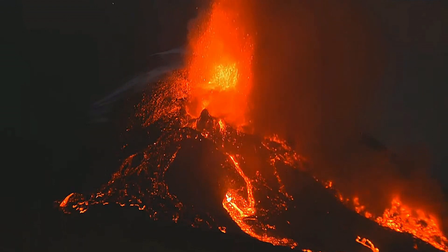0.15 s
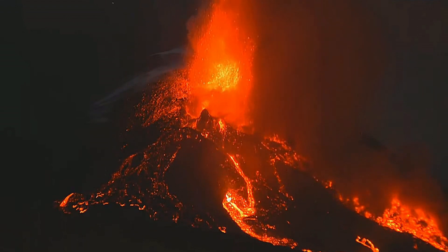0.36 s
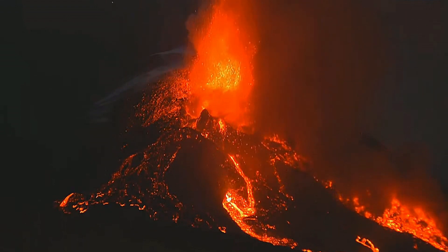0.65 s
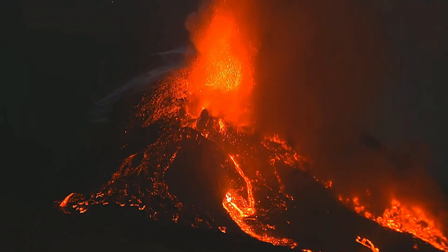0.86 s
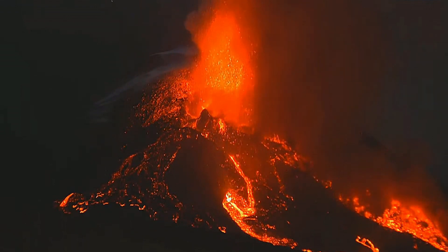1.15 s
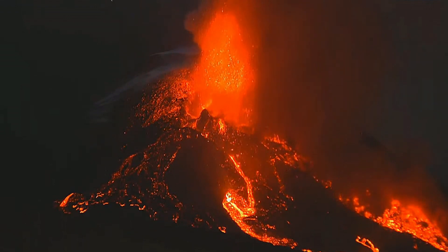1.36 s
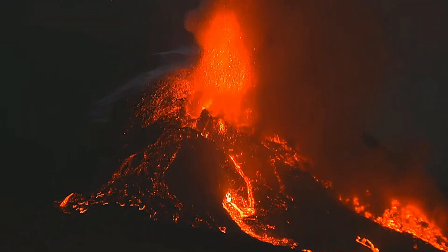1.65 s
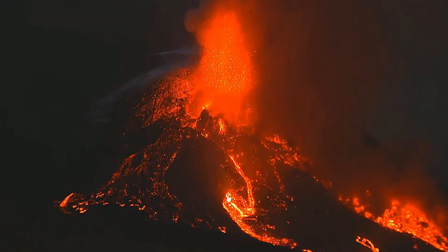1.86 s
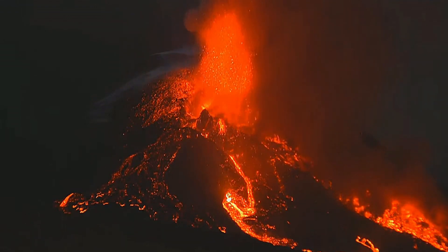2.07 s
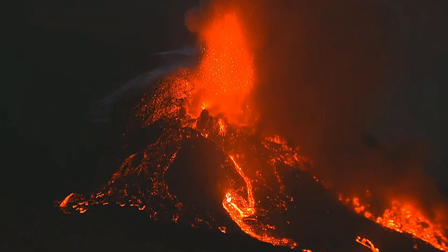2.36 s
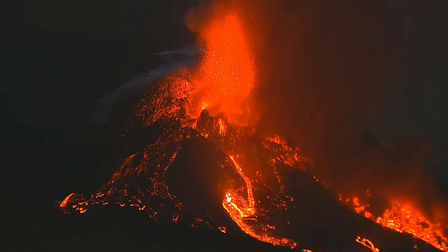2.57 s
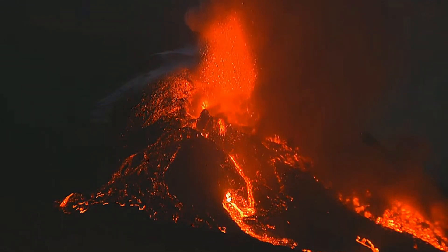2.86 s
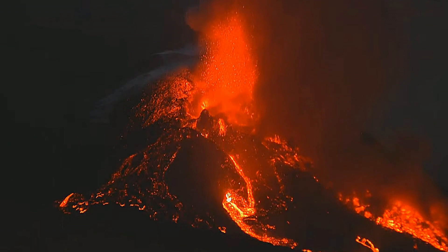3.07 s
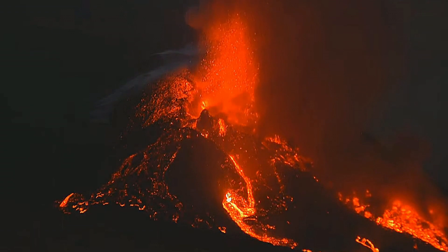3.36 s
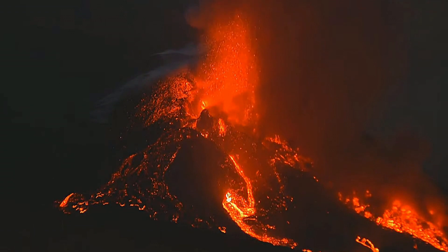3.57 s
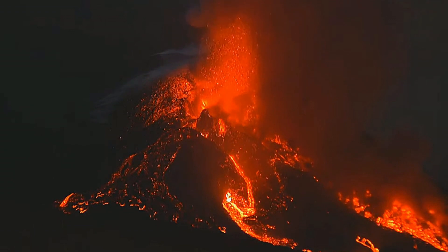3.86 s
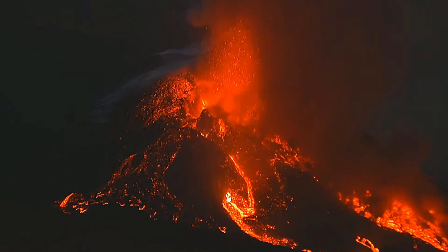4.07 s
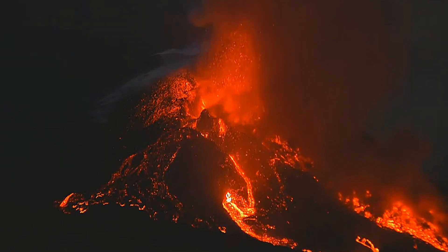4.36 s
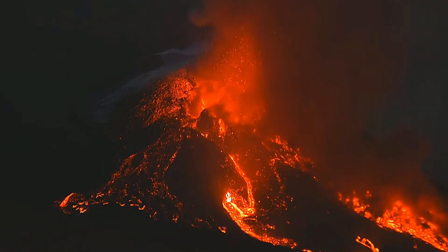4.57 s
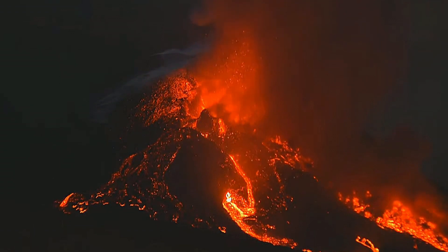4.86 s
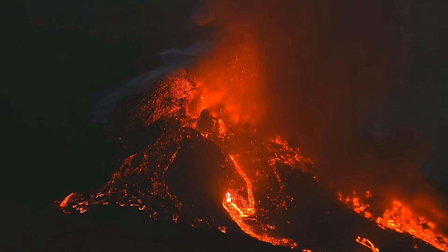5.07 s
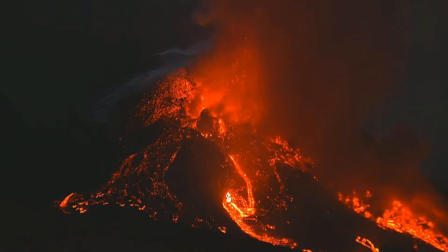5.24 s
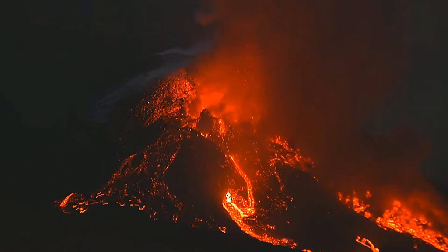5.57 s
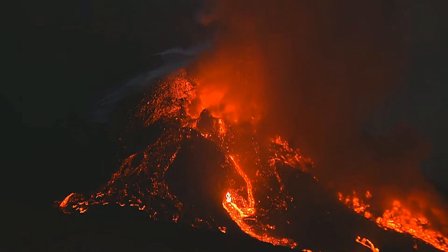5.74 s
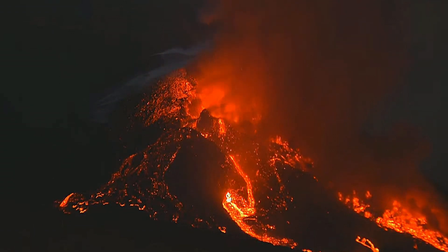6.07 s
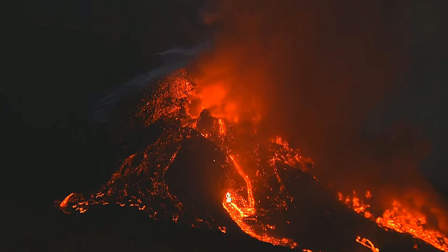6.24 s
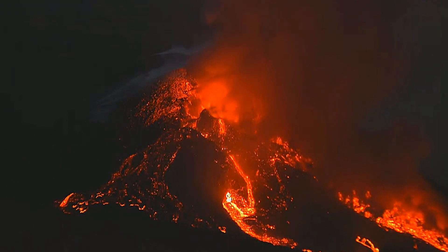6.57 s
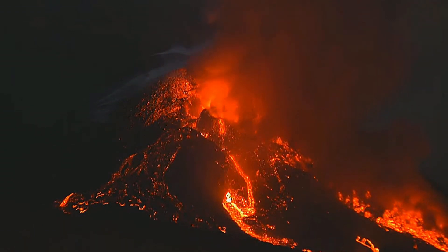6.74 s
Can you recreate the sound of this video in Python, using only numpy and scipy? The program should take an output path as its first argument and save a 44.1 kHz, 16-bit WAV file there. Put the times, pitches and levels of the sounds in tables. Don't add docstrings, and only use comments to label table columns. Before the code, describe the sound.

Outdoor stereo pickup of a distant volcanic eruption in the dark. The deep turbulent roar never stops; it sags a little after one second, pulses unevenly, and grows somewhat fuller near five seconds and again at the end. Its treble is dulled by distance and coloured by slope echoes. Barely audible nearby details include dry grit ticks, tiny high peeps, drifting night-air hiss and a thin, even microphone hiss.

```python
import sys
import numpy as np
from scipy import signal
from scipy.fft import rfft, irfft, next_fast_len
from scipy.io import wavfile
from scipy.ndimage import uniform_filter1d

SR = 44100
rng = np.random.default_rng(int(sys.argv[2]) if len(sys.argv) > 2 else 0)


def digitize_waveform(pressure):
    field = np.atleast_2d(pressure).T
    bounded = np.clip(field, -1, 1)
    quanta = np.round(bounded * 32767).astype(np.int16)
    wavfile.write(sys.argv[1], SR, quanta)


def attenuation_scalar(level_db):
    decades = np.asarray(level_db, float) / 20
    return 10 ** decades


N = 304731
TIME_S = np.arange(N) / SR
FRAME = next_fast_len(N)
HZ = np.fft.rfftfreq(FRAME, 1 / SR)

LAYER_SPLITS_HZ = [87, 135, 250]


def set_rms(x, db):
    return x * attenuation_scalar(db) / np.sqrt(np.mean(x ** 2))


def colour(table, hz):
    points = np.array(table, float)
    gain_db = np.interp(np.log(hz + 1), np.log(points[:, 0]), points[:, 1], left=-140, right=-140)
    return attenuation_scalar(gain_db)


def hiss(table):
    spectrum = rfft(rng.standard_normal(FRAME)) * colour(table, HZ)
    return set_rms(irfft(spectrum, FRAME)[:N], 0)


def swell(centre_s, rise_db, length_s):
    return rise_db * np.exp(-np.log(16) * ((TIME_S - centre_s) / length_s) ** 2)


def microphone_hiss():
    # (frequency [Hz], density [dB per Hz])
    mic_colour = [(3240, -35), (5500, -13.5), (6490, -15.5), (8640, -3), (9840, -10.5), (12900, 0.5),
                  (14700, 0.5), (15500, -5.5)]
    return attenuation_scalar(-75.5) * hiss(mic_colour)


def night():
    # (frequency [Hz], density [dB per Hz])
    night_colour = [(1470, -28.5), (2500, -9), (2640, 0), (3530, -1), (4250, -7), (5930, -16),
                    (6500, -28.5), (8450, -52.5), (14300, -120)]
    # (time [s], rise [dB], pitch [Hz], length [s])
    breezes = [
        (.22, 3.5, 2800, 0.4),
        (3.203, 6.5, 2100, .8),
        (4.902, 1, 3500, 0.38),
        (5.6, -1.5, 3500, .4),
    ]
    side_db, patchy_db = -14, 0.6
    reach_octaves = 1.1
    air = rfft([hiss(night_colour), attenuation_scalar(side_db) * hiss(night_colour)], FRAME)
    out = 0
    for band_hz in range(1000, 9000, 1000):
        patch = np.interp(np.arange(N), np.linspace(0, N, 110), rng.standard_normal(110))
        breath_db = 0
        for s, rise_db, pitch_hz, length_s in breezes:
            nearness = np.exp(-(np.log2(band_hz / pitch_hz) / reach_octaves) ** 2)
            breath_db = breath_db + swell(s, rise_db, length_s) * nearness
        share = np.clip(1 - np.abs(HZ - band_hz) / 1000, 0, 1)
        band = irfft(air * share, FRAME)[:, :N]
        out = out + band * attenuation_scalar(patchy_db * patch + breath_db)
    return out * attenuation_scalar(-76)


def ticks():
    # (time [s], peak [dB], centre [Hz], width [Hz], decay [s])
    grit = [(.1255, -50, 2700, 2000, .002), (.126, -67, 4700, 1600, .002), (.17, -64.5, 3900, 500, .04),
            (.172, -58, 2600, 1800, .04), (.2, -65, 3350, 300, .012), (.33, -63, 3200, 1100, .02),
            (.36, -69, 3300, 500, .012), (.615, -63, 2450, 400, .008), (2.708, -65, 3500, 400, .005),
            (2.8705, -48, 2600, 2000, .001), (2.871, -63, 4700, 1800, .001), (2.883, -63, 3000, 2000, .002),
            (4.598, -67, 3500, 1500, .003)]
    out, t = np.zeros(N), np.arange(4096) / SR
    for s, peak_db, centre_hz, width_hz, decay_s in grit:
        burst = rng.standard_normal(len(t)) * np.exp(-t / decay_s)
        burst[0] += 0.27 / decay_s ** 0.5
        band_hz = [centre_hz - width_hz / 2, centre_hz + width_hz / 2]
        burst = signal.sosfilt(signal.butter(3, band_hz, "band", fs=SR, output="sos"), burst)
        out[int(s * SR):][:len(t)] += attenuation_scalar(peak_db) * burst / np.abs(burst).max()
    return out


def peeps():
    # (time [s], length [s], start [Hz], end [Hz], peak [dB])
    calls = [(.415, .032, 2960, 2970, -71), (.455, .04, 3480, 3450, -73), (.52, .025, 2980, 2980, -74),
             (1.587, .06, 3400, 3410, -68), (1.655, .015, 3400, 3400, -73),
             (1.684, .028, 3400, 3400, -69.5), (1.72, .02, 3400, 3400, -68.5),
             (1.743, .019, 3400, 3400, -68.5), (1.76, .02, 3400, 3400, -72), (1.695, .055, 2955, 2995, -70),
             (1.735, .03, 3070, 3085, -73)]
    out = np.zeros(N)
    breath = uniform_filter1d(rng.standard_normal(N), size=150)
    hoarse = 1 + 0.15 * set_rms(breath, 0)
    for s, length_s, start_hz, end_hz, peak_db in calls:
        n = int(length_s * SR)
        phase = 2 * np.pi * np.cumsum(np.linspace(start_hz, end_hz, n)) / SR
        out[int(s * SR):][:n] += attenuation_scalar(peak_db) * np.hanning(n) * np.sin(phase)
    return out * hoarse


def echoes(modes, direct):
    t60_s, echo_share, dense_hz = 0.35, 0.5, 1880
    mode_depth = 0.96
    t = np.arange(SR) / SR
    decay = rng.standard_normal(SR) * 1000. ** (-t / t60_s)
    tail = rfft(set_rms(decay, 0) / np.sqrt(SR), FRAME)
    path = (direct + echo_share * tail) / np.hypot(direct, echo_share)
    dense = 1 / (1 + (dense_hz / (HZ + 1)) ** 12)
    ripple_db = 0
    for hz, width_hz, db in modes:
        ripple_db = ripple_db + db * np.exp(-np.log(16) * ((HZ - hz) / width_hz) ** 2)
    return path / np.abs(path) ** (1 - dense) * attenuation_scalar(mode_depth * ripple_db)


def vent():
    # (time [s], effort [dB])
    effort = [(0.0, 1.3), (0.63, 0.1), (1.26, -3), (1.88, -0.8), (2.51, -0.9), (3.14, -0.7), (3.77, -0.5),
              (4.4, 2), (5.03, 4.5), (5.65, -1), (6.28, 0.2), (6.91, 2.8)]
    rest_db = [-41, -37.5, -36.5, -38.5]
    follow = [-.9, 1.25, -0.014, 0.35]
    # (time [s], rise [dB], pitch [Hz], length [s])
    bursts = [(0.06, 4, 60.0, 0.13), (0.1, 8.5, 98.0, 0.048), (0.26, 2, 51.0, 0.077),
              (0.48, 3.4, 96.0, 0.07), (0.95, 4, 56.0, 0.34), (1.15, 5, 99.0, 0.38), (1.52, 8, 113.0, 0.044),
              (1.63, 6, 113.0, 0.033), (1.69, 0, 55.0, 0.11), (1.89, 1, 110.0, 0.6), (2.25, -1.5, 49.0, 0.1),
              (2.26, 5, 117.0, 0.044), (2.37, 7, 113.0, 0.046), (2.58, 5, 118.0, 0.21),
              (3.32, 3, 114.0, 0.36), (3.69, 5.5, 112.0, 0.08), (3.88, 2, 52.0, 0.4), (4.3, 7, 116.0, 0.15),
              (4.81, 2, 49.0, 0.21), (4.81, 3.5, 117.0, 0.38), (5.07, 8.5, 51.0, 0.088),
              (5.29, 5.6, 50.0, 0.17), (5.66, 1, 42.0, 0.06), (5.9, 4.5, 47.0, 0.086),
              (5.95, 6, 110.0, 0.37), (6.04, 3.5, 57.0, 0.09), (6.31, 3.5, 50.0, 0.18),
              (6.44, 0, 115.0, 0.1), (6.64, 7, 52.0, 0.05), (6.76, -1, 104.0, 0.042),
              (0.047, 3, 159.0, 0.12), (0.086, 2.5, 528.0, 0.31), (0.265, 4.5, 151.0, 0.059),
             (0.35, 2.5, 532.0, 0.058), (0.416, 3.5, 183.0, 0.081), (0.485, 2.5, 548.0, 0.075),
             (0.556, 7, 161.0, 0.065), (0.735, 1.5, 543.0, 0.065), (0.97, 1.5, 541.0, 0.33),
             (1.05, 4, 161.0, 0.15), (1.286, 1.5, 538.0, 0.18), (1.724, 6.5, 174.0, 0.035),
             (2.445, 6.5, 161.0, 0.042), (2.697, 3.5, 154.0, 0.07), (3.188, 5, 155.0, 0.057),
             (3.484, 1, 520.0, 0.037), (3.853, 6.5, 155.0, 0.06), (4.184, 4.5, 189.0, 0.09),
             (4.21, 0.5, 575.0, 0.15), (4.853, 6.5, 180.0, 0.21), (4.873, 0.5, 517.0, 0.28),
             (5.094, 6, 181.0, 0.058), (5.305, 5.4, 153.0, 0.045), (5.322, 1, 508.0, 0.056),
             (5.672, 6.5, 155.0, 0.048), (5.995, 0.5, 522.0, 0.12), (6.055, 5.6, 153.0, 0.15),
             (6.218, 0.5, 564.0, 0.073), (6.36, 1.5, 509.0, 0.1), (6.65, 5, 176.0, 0.52)]
    effort_db = np.interp(TIME_S, *np.transpose(effort))
    levels = np.outer(follow, effort_db) + np.array(rest_db)[:, None]
    for s, rise_db, pitch_hz, length_s in bursts:
        levels[np.searchsorted(LAYER_SPLITS_HZ, pitch_hz)] += swell(s, rise_db, length_s)
    return levels


def fountain():
    # (frequency [Hz], density [dB per Hz])
    centre_colour = [(15, -41), (25, -7), (70, 1.5), (107, 1.5), (130, -0.5), (240, -12), (275, -15),
                     (678, -16), (746, -22.5), (805, -21), (939, -25), (1280, -29.5), (2450, -50.5),
                     (3180, -84), (5390, -120)]
    # (frequency [Hz], density [dB per Hz])
    side_colour = [(59, -47), (100, -15.5), (177, -19.5), (242, -11.5), (291, -10.5), (398, -10.5),
                   (521, -1.5), (664, 0), (733, -4.5), (1300, -18.5), (3000, -47), (3900, -76.5),
                   (6600, -120)]
    # (frequency [Hz], width [Hz], gain [dB])
    centre_modes = [(43.7, 24, 5), (120.8, 13, 4.5), (147, 14, 4.5), (173.2, 8, -6), (197, 9.4, 3),
                    (198, 7.7, -3.5), (217.2, 12, -2), (250, 56, 2.5), (268.4, 17, -4), (314, 39, 1),
                    (338, 13, -1.6), (342, 12, 3.5), (355, 25, -3.5), (403, 23, 4.5), (419, 26, -5.5),
                    (458.3, 26, 5), (460, 15, -3), (493, 27, -1), (525, 13, -4.5), (532, 16, 5),
                    (579, 15, 0.5), (601, 27, 3.0), (624, 15, -3), (659.5, 6.1, 6), (678, 14, -2),
                    (713, 34, 5.5), (717, 28, -4), (744, 13, 1.1),
                    (802, 28, 4.5), (838, 15, -4.8), (880, 28, 2.6), (925, 15, 2.6), (961, 28, -4.9),
                  (980, 22, 5.8), (999, 24, -6.2), (1024, 24, 5.4), (1054, 28, -3.4), (1097, 23, 5.1),
                  (1145, 27, -5.0), (1200, 23, 3.8), (1226, 24, -3.7), (1241, 16, 3.1), (1261, 19, -6.0),
                  (1283, 28, 7.2), (1343, 24, -5.9), (1381, 14, 3.3), (1448, 28, -2.6), (1560, 28, 4.9),
                  (1577, 20, -6.9), (1639, 22, 4.3), (1655, 17, -3.5), (1736, 20, 3.2), (1755, 23, -5.8),
                  (1795, 28, 2.5), (1816, 15, -3.8), (1833, 21, 2.5)]
    # (frequency [Hz], width [Hz], gain [dB])
    side_modes = [(245, 34, 6.5), (301, 27, -5.5), (326, 40, 2.5), (361, 15, -0.5), (377, 16, 1),
                  (392, 40, -3.5), (462, 21, 7), (487, 35, -5), (536, 40, 5.5), (563, 42, -8.5),
                  (594, 14, 3.5), (630, 14, -5.5), (647, 24, 4.5), (668, 18, -7.5), (690, 27, 7.5),
                  (723, 40, -8.5), (765, 34, 4), (805, 13, -3), (856, 22, 5.5), (960, 36, -7),
                  (981, 40, 1.5), (1011, 14, -2.5), (1059, 20, 4.5), (1094, 20, -6), (1171, 27, 4),
                  (1237, 40, -9), (1269, 40, 7.5), (1365, 39, -5), (1429, 40, 1), (1466, 25, -2)]
    steadiness = [1, 0.52, 0.59, 0.54]
    jet = rfft(rng.standard_normal(FRAME))
    centre = jet * colour(centre_colour, HZ) * echoes(centre_modes, 1)
    side = jet * colour(side_colour, HZ) * echoes(side_modes, 0)
    side *= attenuation_scalar(-17.5) * np.linalg.norm(centre) / np.linalg.norm(side)
    below = [0] + [1 / (1 + (HZ / hz) ** 20) for hz in LAYER_SPLITS_HZ] + [1]
    out = 0
    for k, layer_db in enumerate(vent()):
        band = below[k + 1] - below[k]
        layer = irfft(band * np.array([centre, side]), FRAME)[:, :N]
        power = uniform_filter1d(layer[0] ** 2, size=3000)
        flutter = uniform_filter1d(power, size=3000) ** 0.5
        layer = layer / flutter ** np.clip(steadiness[k], 0, 1)
        out = out + layer / np.std(layer[0]) * attenuation_scalar(layer_db)
    return out


def scene():
    centre, side = fountain() + night()
    centre = centre + ticks() + peeps()
    return np.array([centre + side, centre - side])


def roll_off(x):
    return signal.sosfilt(signal.butter(12, 15370, fs=SR, output="sos"), x)


def record(dry):
    low_cut = signal.butter(2, 23, "high", fs=SR, output="sos")
    wet = signal.sosfilt(low_cut, dry + microphone_hiss())
    fade = np.sin(np.pi / 2 * np.clip(np.arange(N, 0, -1) / 300, 0, 1)) ** 2
    return roll_off(wet * fade)


dry = scene()
out = record(dry)
digitize_waveform(out)
```